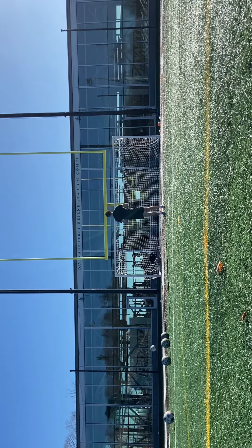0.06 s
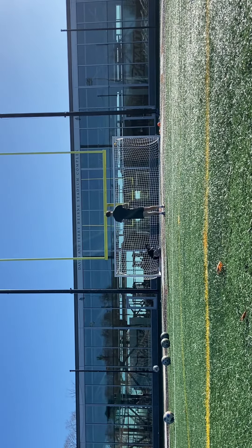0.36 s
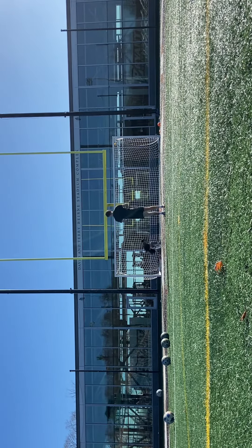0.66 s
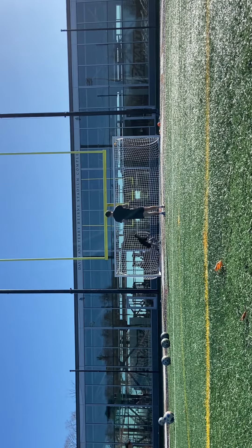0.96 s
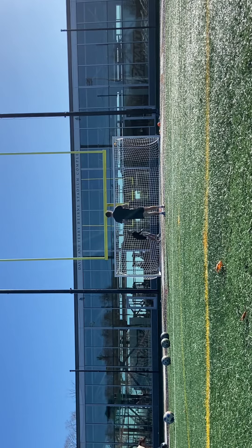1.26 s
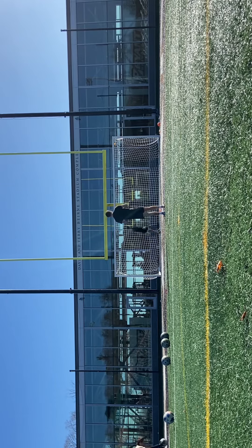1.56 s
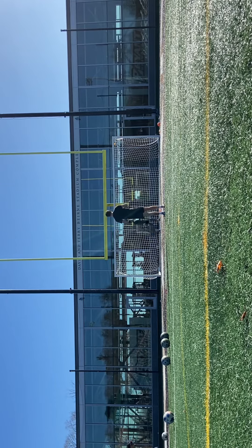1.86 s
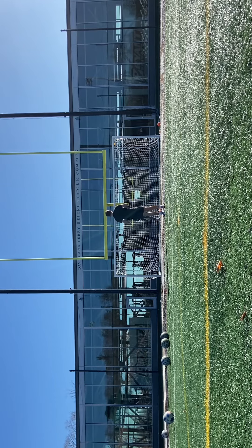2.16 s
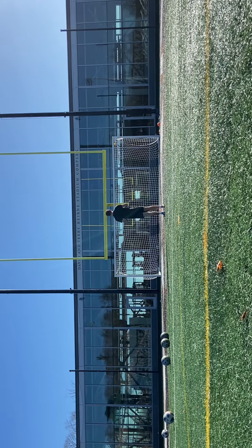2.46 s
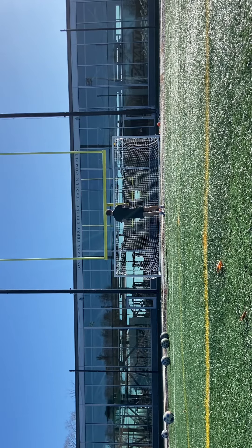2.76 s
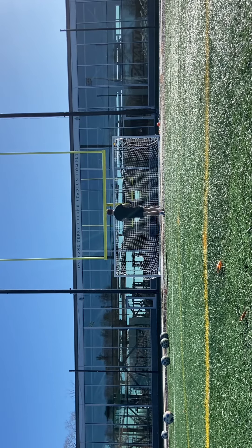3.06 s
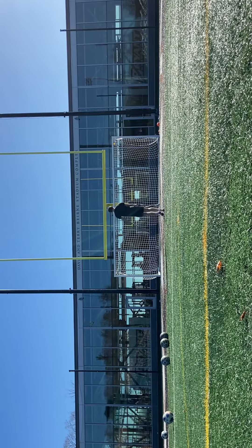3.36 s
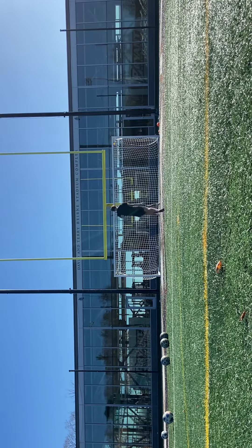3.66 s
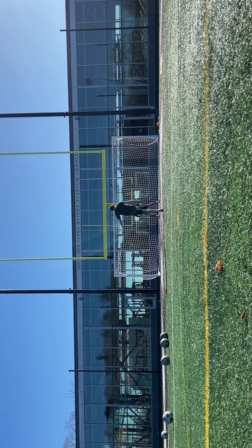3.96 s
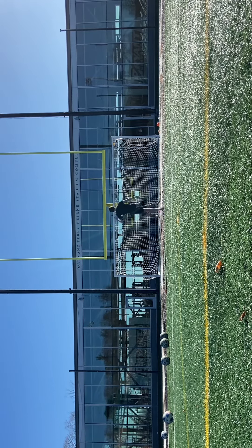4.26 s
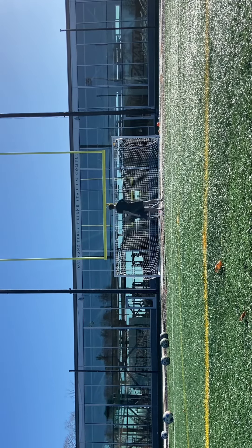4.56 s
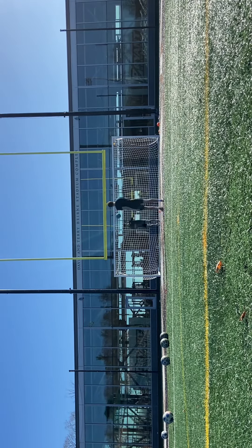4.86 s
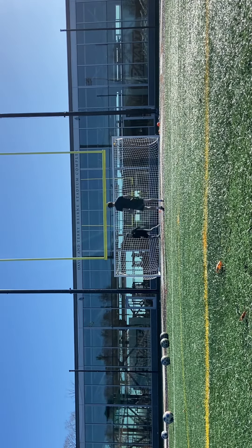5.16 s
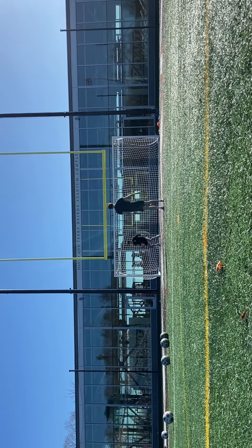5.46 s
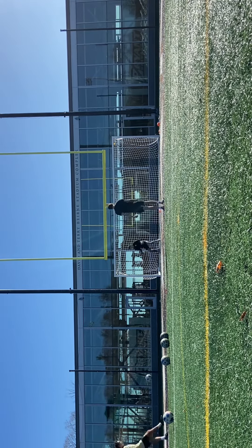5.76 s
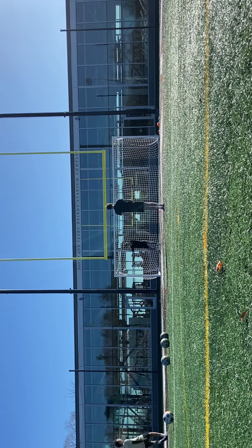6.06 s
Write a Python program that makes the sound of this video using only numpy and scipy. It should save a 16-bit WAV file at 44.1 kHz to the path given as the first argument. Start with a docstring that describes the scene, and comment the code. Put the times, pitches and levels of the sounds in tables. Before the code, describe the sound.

An outdoor artificial pitch is heard from a microphone at turf height, with a faint, steady town hum and a low rumble that fades after about 2 seconds. At 0.1 seconds a ball gives one soft, heavy thump; a few far fainter thumps follow until about 4.2 seconds. Wind strikes the microphone in short, fluttering puffs, weak at first, stronger around 2 and 2.7 seconds. The strongest gust, from 3.2 to 3.7 seconds, churns and booms hollowly, with dry spitting snaps. Thinner, crackling puffs with little bass continue until about 5 seconds. A sharp, hard knock with a brief rattle stands out at 4.3 seconds; lighter ticks, faint rustles and scuffs come and go. The wind lulls, then puffs return from 5.7 seconds to the end just after 6. Small birds chirp and whistle very faintly in the distance throughout.

```python
"""A low rumble and a distant town's hum, then a ball's thump, on an artificial pitch in gusty wind.
The microphone is in a camera standing on the turf. Eddies hit its port as short, fluttering puffs
that spit at their crests; the bass thins out while the gusts last, and the strongest gust churns
and booms hollowly. Small birds chirp and whistle far off; light knocks, rustles and scuffs come and go."""
import sys
import numpy as np
from scipy import signal
from scipy.fft import rfft, irfft, next_fast_len
from scipy.io import wavfile
from scipy.ndimage import uniform_filter1d, map_coordinates

SR = 44100
rng = np.random.default_rng(int(sys.argv[2]) if len(sys.argv) > 2 else 0)


def unload_audio(sound):
    """Save the sound as a 16-bit wav file, at the path given as the first command line argument."""
    columns = np.transpose(np.atleast_2d(sound))
    # keep every value between -1 and 1, then stretch to whole-number steps
    steps = np.round(np.clip(columns, -1, 1) * 32767)
    wavfile.write(sys.argv[1], SR, steps.astype(np.int16))


N = 272979


def amp(db):
    """Decibels to gain."""
    return 10 ** (np.asarray(db) / 20)


def unit(x):
    """Scale to rms 1."""
    return x / np.sqrt(np.mean(x ** 2) + 1e-30)


def along(points, hz):
    """(Hz, value) points read on a log axis."""
    freqs, values = np.transpose(points)
    return np.interp(np.log(hz + 1), np.log(freqs + 1), values)


def wobble(rate, size=N):
    """A smooth random curve, rate knots a second."""
    return map_coordinates(rng.standard_normal(4096), [np.arange(size) * rate / SR], mode="mirror")


def filtered(x, response):
    """x times a complex response of frequency."""
    n = x.shape[-1]
    padded = next_fast_len(n + n // 10)
    return irfft(rfft(x, padded) * response(np.fft.rfftfreq(padded, 1 / SR)), padded)[..., :n]


def noise(size, colour):
    """Noise of rms 1, coloured by a gain for each frequency."""
    return unit(filtered(rng.standard_normal(size), colour))


def above(hz, edge_hz, steep):
    """Gain of a low cut."""
    return 1 / np.sqrt(1 + (edge_hz / (hz + 1)) ** (2 * steep))


def add(track, s, sound):
    """Mix a sound into a track from time s."""
    start = round(s * SR)
    a, b = max(start, 0), min(start + len(sound), N)
    track[a:b] += sound[a - start:b - start]


def from_left(x, lag_s):
    """A sound that reaches the left port sooner by lag_s (later, if negative)."""
    return filtered(x, lambda hz: np.exp(-2j * np.pi * hz * np.array([[0], [lag_s]])))


# The town's hum and rumble, far beyond the pitch: (frequency [Hz], relative level [dB])
HUM_SPECTRUM = [(150, -3.5), (300, -12.5), (500, -5), (900, -3.5), (1300, -3.5), (2000, -10), (2600, -12.5),
                (3400, -19), (5200, -22.5), (6500, -29.5), (8500, -43), (11500, -43.5), (15000, -50)]
RUMBLE_SPECTRUM = [(120, 10.5), (220, 3), (330, 0.5), (500, -6.5), (800, -20.5), (1500, -65.5)]
# The rumble's rise and fall: (time [s], level [dB])
RUMBLE_LEVELS = [(0, -47), (.5, -51), (1.4, -44), (2.4, -62.5), (6.19, -63)]
def town(hum_db=-58, waver_db=2.0, flutter_db=3.0):
    """A wide, steady hum from far away to the right, over a low, uneven rumble."""
    def stereo(spectrum, alike):
        mid, side = filtered(rng.standard_normal((2, N)), lambda hz: amp(along(spectrum, hz)))
        side = side * np.sqrt((1 - alike) / (1 + alike))
        return unit(np.array([mid + side, mid - side]))
    hum = stereo(HUM_SPECTRUM, alike=0.39) * amp(hum_db + waver_db * wobble(2.4))
    rumble_db = np.interp(np.arange(N) / SR, *np.transpose(RUMBLE_LEVELS))
    rumble = stereo(RUMBLE_SPECTRUM, alike=1.0) * amp(rumble_db + flutter_db * wobble(13))
    return from_left(hum + rumble, lag_s=-0.00039)


# Where the bass ends at the microphone, higher in the gusts: (time [s], edge [Hz])
LOW_CUT = [(0, 224), (1.85, 229), (1.94, 287), (1.985, 432), (2.03, 526), (2.1, 540), (2.52, 525),
           (2.565, 292), (2.61, 440), (2.67, 380), (2.71, 230), (3.05, 350), (3.25, 201), (3.6, 234),
           (3.68, 503), (3.9, 560), (4.5, 683), (5.45, 525), (5.62, 340), (6.19, 320)]
def thin_bass(x):
    """Take away what lies under the moving bass edge."""
    hz, times, spectra = signal.stft(x, SR, nperseg=1024, noverlap=768)
    spectra = spectra * above(hz[:, None], np.interp(times, *np.transpose(LOW_CUT)), steep=10.7)
    return signal.istft(spectra, SR, nperseg=1024, noverlap=768)[1][..., :N]


# The ball, near and far on the pitch: (time [s], level [dB], toneless share [0-1])
BALL_THUMPS = [(0.116, -22, 0.16), (0.815, -67, 1), (1.132, -53, 0.9), (1.66, -60, 1), (1.848, -60, 0.9),
               (3.277, -47, 0.75), (4.234, -58, 0.05)]
def ball_thumps(rest_hz=54, drop_hz=290, settle_s=0.0086, rise_s=0.022, slap_s=0.014, lowest_hz=40):
    """A soft, heavy blow: a slap, then a few uneven, sinking cycles; far ones are mostly toneless."""
    out, t = np.zeros(N), np.arange(SR // 6) / SR
    swell = (t / rise_s * np.exp(1 - t / rise_s)) ** 3
    swell /= 1 + (t / (2.3 * rise_s)) ** 14  # stops short
    contact = (t / slap_s * np.exp(1 - t / slap_s)) ** 2
    def low_noise(top_hz):
        return noise(len(t), lambda hz: above(hz, lowest_hz, steep=2) / (1 + (hz / top_hz) ** 4))
    for s, db, toneless in BALL_THUMPS:
        uneven = np.exp(0.2 * wobble(150, len(t)))
        pitch_hz = (rest_hz + drop_hz * np.exp(-t / settle_s)) * uneven
        tone = np.sin(2 * np.pi * np.cumsum(pitch_hz) / SR)
        body = (1 - toneless) * tone + toneless * low_noise(top_hz=115)
        slap = amp(-16) * contact * low_noise(top_hz=420)
        add(out, s, amp(db) * (swell * body + slap))
    return signal.sosfilt(signal.butter(3, lowest_hz, "highpass", fs=SR, output="sos"), out)


# Wind at the microphone: (time [s], small-eddy level [dB], reach [Hz])
GUSTS = [(0, -81, 230), (1.2, -47.5, 181), (1.8, -38, 226), (2.25, -40.5, 306), (2.401, -56, 320),
         (3.1, -40.5, 324), (3.351, -42.5, 308), (3.801, -44, 778), (4.55, -43, 783), (4.999, -46.5, 654),
         (5.3, -52, 397), (5.65, -41, 286), (6.19, -44, 253)]
def wind_at(s):
    """Level and reach at time s; the reach sets how far up in pitch the turbulence extends."""
    times, db, reach_hz = np.transpose(GUSTS)
    return np.interp(s, times, db), np.interp(s, times, reach_hz)


def small_eddies(per_s=24, typical_s=0.0095, scatter_db=4):
    """A loose train of weak puffs that follows the wind: (time [s], level [dB], duration [s])."""
    count = int(per_s * N / SR)
    times = (np.arange(count) + rng.random(count)) / per_s
    louder, longer = rng.standard_normal((count, 2)).T
    levels = wind_at(times)[0] + scatter_db * np.minimum(louder, 1)
    return list(zip(times, levels, typical_s * np.exp(0.79 * longer)))


# How the microphone port colours the air's noise: (frequency [Hz], gain [dB])
PORT_RESPONSE = [(150, 6.5), (250, -10), (330, -7.5), (400, -5.5), (470, 1), (600, 3.5), (900, 8),
                 (1300, 7.5), (2000, 1), (3000, -1), (6000, 7.5)]
def turbulence(size, reach_hz, edge_hz):
    """Swirling air at the port: ever smaller whirls are exponentially weaker."""
    def colour(hz):
        return amp(along(PORT_RESPONSE, hz)) * np.exp(-hz / reach_hz) * above(hz, edge_hz, steep=2.69)
    return noise(size, colour)


USUAL_EDDY_DB, BRIGHTEST_EDDY_DB = -27.5, -15.5  # past the second, an eddy gets no brighter
def eddy(s, db, duration, flutter_db=4.0, db_per_octave=13, lowest_hz=290):
    """One puff, centred in a quarter second: it swells, crackles and fades, brightest on its crests."""
    t = np.arange(-SR // 8, SR // 8) / SR
    capped_db = min(db, BRIGHTEST_EDDY_DB)
    reach_hz = wind_at(s)[1] * 2 ** ((capped_db - USUAL_EDDY_DB) / db_per_octave)
    edge_hz = max(np.interp(s, *np.transpose(LOW_CUT)), lowest_hz)
    width = duration * np.where(t < 0, 0.91, 1.09)  # rises faster than it falls
    swell = np.exp2(-abs(2 * t / width) ** 1.89 / 2)
    force = swell * amp(flutter_db * np.tanh(wobble(218.55, len(t))))  # small whirls ride the large one
    swirl = turbulence(len(t), 0.79 * reach_hz, edge_hz)
    swirl /= np.sqrt(uniform_filter1d(abs(swirl), size=300))  # evened out, so the force shapes the puff
    crests = unit(force ** 2 * turbulence(len(t), 1.074 * reach_hz, edge_hz))
    puff = unit(force * swirl) + amp(-6) * crests
    puff *= np.linalg.norm(swell) / np.linalg.norm(puff)
    return amp(db) * puff + amp(capped_db) * crackle(force, reach_hz)


# A snap of air right at the port: (frequency [Hz], relative level [dB])
SNAP_SPECTRUM = [(400, -16.5), (900, 16.5), (1500, 6), (2300, -3.5), (3300, -14), (5000, -30.5),
                 (8000, -60)]
def crackle(force, reach_hz, per_s=300, full_reach_hz=750):
    """Tiny dry snaps at chance moments of a puff, fading out in slow air."""
    ticks = force * (rng.random(len(force)) < per_s / SR) * rng.standard_normal(len(force))
    colour = lambda hz: amp(along(SNAP_SPECTRUM, hz))
    snaps = filtered(ticks, lambda hz: colour(hz) / colour(hz).mean())
    return amp(-11) * min(reach_hz / full_reach_hz, 1) ** 2 * snaps


# Strong eddies striking the microphone: (time [s], level [dB], duration [s])
STRONG_EDDIES = [(0.182, -39, 0.0051), (0.488, -37.5, 0.0054), (0.542, -38, 0.01), (0.829, -40, 0.024),
                 (1.133, -34, 0.014), (1.378, -39, 0.056), (1.452, -39, 0.0058), (1.572, -33.5, 0.024),
                 (1.723, -40.5, 0.039), (1.749, -33.5, 0.033), (1.78, -30.5, 0.015), (1.799, -28.5, 0.013),
                 (1.823, -30, 0.012), (1.931, -30.5, 0.027), (1.96, -29, 0.024), (1.984, -21.5, 0.0076),
                 (1.995, -25.5, 0.0087), (2.008, -32, 0.023), (2.062, -38, 0.0075), (2.1, -44.5, 0.02),
                 (2.173, -37, 0.011), (2.223, -36.5, 0.028), (2.266, -36.5, 0.031), (2.323, -40, 0.027),
                 (2.477, -38, 0.0057), (2.515, -38.5, 0.014), (2.557, -33, 0.014), (2.566, -34, 0.015),
                 (2.63, -31, 0.0036), (2.666, -28.5, 0.0118), (2.686, -24, 0.022), (2.896, -31.5, 0.0058),
                 (2.963, -42, 0.0072), (3.004, -33.5, 0.0065), (3.03, -38, 0.025), (3.077, -36, 0.0065),
                 (3.134, -30.5, 0.0061), (3.178, -34.5, 0.015), (3.2574, -24, 0.011), (3.281, -13.5, 0.016),
                 (3.299, -22.5, 0.0056), (3.356, -21, 0.015), (3.392, -23, 0.014), (3.41, -32, 0.0049),
                 (3.441, -20, 0.015), (3.5706, -34, 0.008), (3.6094, -29, 0.0052), (3.61, -23.5, 0.0094),
                 (3.626, -26, 0.014), (3.666, -28, 0.017), (3.699, -29, 0.018), (3.741, -35.5, 0.012),
                 (3.841, -29.5, 0.015), (3.869, -29.5, 0.02), (3.917, -40, 0.022), (3.997, -29, 0.017),
                 (4.015, -30.5, 0.016), (4.027, -38, 0.0067), (4.045, -29.5, 0.012), (4.11, -26.5, 0.0076),
                 (4.137, -33.5, 0.022), (4.153, -29.5, 0.0035), (4.175, -35.5, 0.0089),
                 (4.202, -29, 0.0066), (4.212, -29, 0.014), (4.2463, -29, 0.0093), (4.261, -25.5, 0.0077),
                 (4.299, -35, 0.019), (4.35, -29, 0.03), (4.366, -33.5, 0.0059), (4.413, -36, 0.005),
                 (4.426, -29, 0.0063), (4.445, -28.5, 0.016), (4.487, -28.5, 0.018), (4.52, -29.5, 0.012),
                 (4.594, -29.5, 0.01), (4.615, -27.5, 0.023), (4.636, -34.5, 0.0097),
                 (4.658, -26.5, 0.0013), (4.675, -38.5, 0.0037), (4.748, -43.5, 0.029), (4.817, -38, 0.03),
                 (4.887, -42, 0.022), (4.925, -29, 0.01), (4.947, -34, 0.024), (5.005, -37.5, 0.0056),
                 (5.017, -42, 0.021), (5.093, -45, 0.015), (5.515, -41.5, 0.0059), (5.546, -42, 0.0084),
                 (5.687, -33, 0.018), (5.722, -34.5, 0.026), (5.88, -36, 0.016), (5.935, -35, 0.013),
                 (5.977, -32, 0.012), (6.04, -28, 0.021), (6.148, -34.5, 0.016)]
# The wind's lead in the right channel: (frequency [Hz], phase [rad])
WIND_RIGHT_LEAD = [(100, 0), (280, 1.21), (550, 1.19), (1200, 1.6), (1550, 3), (2300, 8)]
# The wind's lean to the left: (frequency [Hz], left minus right [dB])
WIND_LEFT_BIAS = [(200, 0), (850, 1.5), (1200, 3.5), (1750, 16.5), (3000, 17)]
def wind(stray_db=-13):
    """Eddies, booms and spits pass one after another; both channels mostly share one port."""
    air = booms() + spits()
    for s, db, duration in STRONG_EDDIES + small_eddies():
        puff = eddy(s, db, duration)
        add(air, s - len(puff) / SR / 2, puff)
    # a second port feels the same puffs, weaker and with a swirl of its own
    strength = np.sqrt(abs(uniform_filter1d(air ** 2, size=400)))
    stray = amp(stray_db) * strength * turbulence(N, reach_hz=231, edge_hz=110)
    def channels(hz):
        right = amp(-along(WIND_LEFT_BIAS, hz)) * np.exp(1j * along(WIND_RIGHT_LEAD, hz))
        return np.array([np.ones_like(right), right]) * np.sqrt(2 / (1 + abs(right) ** 2))
    return filtered(air, channels) + np.array([stray, -stray])


# Faint rustles in front of the microphone: (time [s], relative level [dB], duration [s])
LONE_RUSTLES = [(1.824, -63, 0.016), (2.015, -59, 0.05), (2.153, -64, 0.02), (2.956, -58.5, 0.052),
                (3.075, -65, 0.035), (3.151, -63.5, 0.016), (3.3, -60, 0.03), (3.455, -61.5, 0.023),
                (3.611, -62, 0.026), (3.715, -62, 0.026), (3.855, -61, 0.035), (3.975, -60.5, 0.059),
                (4.062, -61, 0.013), (4.324, -58.5, 0.12), (4.518, -61.5, 0.027), (4.582, -64.5, 0.018),
                (4.8, -59, 0.011), (4.956, -59, 0.033), (5.725, -58, 0.021), (6.013, -61, 0.02)]
# Their high, thin colour: (frequency [Hz], relative level [dB])
RUSTLE_SPECTRUM = [(1500, 3), (3500, 12.5), (5500, 2), (7800, 8.5), (9000, -21.5), (10200, 3.5), (12000, 3),
                   (13200, -17.5), (14700, 2), (15500, -13)]
def rustles(grain_db=5, fast_reach_hz=700, hiss_delay_s=0.008, hiss_s=0.018):
    """Brief, grainy hisses: some on their own, and one behind each strong eddy, louder in fast wind."""
    t = np.arange(N) / SR
    hisses = []
    for s, db, _ in STRONG_EDDIES:
        speed_db = 5.5 * np.log2(wind_at(s)[1] / fast_reach_hz)
        hisses.append((s + hiss_delay_s, -76.5 + 0.15 * (db - USUAL_EDDY_DB) + speed_db, hiss_s))
    swell = sum(amp(db) * np.exp2(-2 * np.minimum(abs(t - s) / duration, 10) ** 2)
                for s, db, duration in LONE_RUSTLES + hisses)
    grains = rng.standard_normal(N) * amp(grain_db * wobble(600))
    return amp(-9) * swell * unit(filtered(grains, lambda hz: amp(along(RUSTLE_SPECTRUM, hz))))


# Small birds, far off: (time [s], duration [s], start pitch [Hz], end pitch [Hz], level [dB])
BIRD_CHIRPS = [(0.43, 0.06, 2800, 3000, -76), (0.49, 0.06, 3380, 3250, -76), (1.06, 0.07, 2600, 2830, -68),
               (6.02, 0.13, 2050, 2230, -72)]
def bird_chirps(quaver=0.015):
    """Each note is one soft, thin glide."""
    out = np.zeros(N)
    for s, duration, from_hz, to_hz, db in BIRD_CHIRPS:
        progress = np.linspace(0, 1, int(duration * SR))
        hz = (from_hz + (to_hz - from_hz) * progress) * (1 + quaver * wobble(400, len(progress)))
        add(out, s, amp(db) * np.sin(np.pi * progress) * np.sin(2 * np.pi * np.cumsum(hz) / SR))
    return out


# A distant bird's thin whistles: (time [s], duration [s], level [dB])
BIRD_WHISTLES = [(0.632, 0.28, -78), (1.85, 0.18, -77.5), (2.913, 0.25, -72), (4.068, 0.15, -70),
                 (5.232, 0.18, -66.5)]
def bird_whistles(from_hz=6720, toward_hz=6220, upper_ratio=1.85, quaver=0.017, echo_t60_s=0.15):
    """Each whistle drops, levels off and fades, with a faint higher line; fence and walls blur it."""
    out = np.zeros(N)
    for s, duration, db in BIRD_WHISTLES:
        progress = np.linspace(0, 1, int(duration * SR))
        hz = toward_hz + (from_hz - toward_hz) * np.exp(-2.5 * progress)
        hz *= 1 + quaver * wobble(970, len(progress))
        phase = 2 * np.pi * np.cumsum(hz) / SR
        swell = np.minimum(progress / 0.027, 1) * (1 - progress) ** 0.27
        upper = amp(-11) * (1 - progress) * np.sin(upper_ratio * phase)
        add(out, s, amp(db) * swell * (np.sin(phase) + upper))
    t = np.arange(SR // 3) / SR
    echo = rng.standard_normal((2, len(t))) * amp(-60 * t / echo_t60_s)
    return signal.fftconvolve(out[None], echo / np.linalg.norm(echo[0]), axes=1)[:, :N]


# Light knocks, near the middle: (time [s], level before the band cut [dB], most excited pitch [Hz])
LIGHT_KNOCKS = [(0.977, -49, 1800), (1.231, -46, 3900), (1.2535, -40, 1700), (1.983, -47, 5000),
                (3.9214, -30, 6000), (4.2695, -16, 1500), (4.2817, -25, 2300), (4.2872, -34, 2300),
                (4.2945, -35, 1700), (4.3215, -45, 3500), (4.338, -46, 3900), (4.3605, -42, 3900),
                (5.716, -48, 3900)]
# The case that rings with them: (frequency [Hz], relative level [dB], time to fall 60 dB [s])
CASE_MODES = [(1440, 3, 0.0062), (2226, 4.5, 0.0098), (3170, -3.5, 0.008), (3840, 0, 0.0058),
              (5250, -8.5, 0.01), (7200, -22.5, 0.0087), (11400, -24, .007)]
def knocks(crack_t60_s=0.0088, tail_db=-25, tail_t60_s=0.085, focus_db_per_octave=7):
    """Hard little contacts without bass: a crack, a short ring and a faint scatter."""
    out, t = np.zeros(N), np.arange(SR // 10) / SR
    for s, db, centre_hz in LIGHT_KNOCKS:
        strike = rng.normal([0, 1], [2, 0.06], (len(CASE_MODES), 2))  # each mode's level and tuning vary
        ring = sum(amp(level + extra_db - 60 * t / t60) * np.sin(2 * np.pi * hz * detune * t)
                   for (hz, level, t60), (extra_db, detune) in zip(CASE_MODES, strike))
        grit = noise(len(t), lambda hz: above(hz, 800, steep=5.8) / (1 + (hz / 3500) ** 2))
        crack = grit * amp(-60 * t / crack_t60_s)
        scatter = grit * amp(tail_db - 60 * t / tail_t60_s)
        hit = (ring + crack + scatter) * (1 - np.exp(-t / 0.0007))
        hit = filtered(hit, lambda hz: amp(-focus_db_per_octave * abs(np.log2((hz + 1) / centre_hz))))
        add(out, s, amp(db) * hit / abs(hit).max())
    return filtered(out, lambda hz: above(hz, 690, steep=9.4) / (1 + (hz / 12500) ** 8))


# Scuffs from across the pitch: (time [s], level [dB], duration [s], centre [Hz])
TURF_SCUFFS = [(2.07, -67.5, 0.018, 4400), (2.947, -70, 0.052, 5000), (3.07, -74, 0.034, 4970),
               (3.24, -70.5, 0.013, 5300)]
def scuffs(half_width_hz=560, grain_db=3):
    """Scuffed turf gives a brief, narrow, grainy hiss."""
    out, t = np.zeros(N), np.arange(-SR // 8, SR // 8) / SR
    for s, db, duration, centre_hz in TURF_SCUFFS:
        hiss = noise(len(t), lambda hz: 1 / (1 + ((hz - centre_hz) / half_width_hz) ** 4))
        swell = np.exp2(-2 * (t / duration) ** 2)
        add(out, s + t[0], amp(db + grain_db * wobble(200, len(t))) * swell * hiss)
    return out


# The sharpest whirls, right at the port: (time [s], level [dB])
PORT_SPITS = [(2.688, -26), (3.2715, -31), (3.2757, -10.5), (3.2842, -27), (3.289, -22.5), (3.361, -26.5),
              (3.439, -32), (3.4437, -18), (3.593, -31), (3.6039, -29), (3.654, -23.5), (3.6683, -31),
              (3.695, -21), (4.026, -21.5), (4.0305, -15), (4.106, -34.5), (4.168, -28), (4.365, -14.5),
              (4.4911, -23), (4.4978, -18), (4.506, -22), (4.617, -27), (4.627, -26), (4.644, -24)]
def spits(life_s=0.00062):
    """A whirl collapses within a millisecond or two: a dry snap, brighter than its puff."""
    out, t = np.zeros(N), np.arange(-SR // 50, SR // 50) / SR
    for s, db in PORT_SPITS:
        burst = rng.standard_normal(len(t)) * np.exp(-abs(t) / life_s)
        snap = filtered(burst, lambda hz: amp(along(SNAP_SPECTRUM, hz)))
        add(out, s + t[0], amp(db) * snap / abs(snap).max())
    return out


# The hollow that the strongest gust stirs: (centre [Hz], width [Hz], relative level [dB])
HOLLOW_RESONANCES = [(210.7, 87, 2.5), (280, 60, -13.5), (476, 110, 7.5)]
# Its churning at the microphone: (time [s], level [dB])
CHURN_LEVELS = [(3.1, -86), (3.21, -40.5), (3.29, -30), (3.37, -39), (3.448, -40.5), (3.51, -52.5),
                (3.6, -44), (3.701, -61), (3.85, -80)]
def churn(flutter_db=1.5):
    """Between its puffs the strongest gust keeps a few low, hollow resonances stirring."""
    def colour(hz):
        return sum(amp(db) / (1 + (2 * (hz - centre) / width) ** 8)
                   for centre, width, db in HOLLOW_RESONANCES)
    level_db = np.interp(np.arange(N) / SR, *np.transpose(CHURN_LEVELS), left=-np.inf, right=-np.inf)
    return amp(level_db + flutter_db * wobble(40)) * noise(N, colour)


# Booms at the port: (time [s], level [dB], duration [s], pitch [Hz], upper partial [dB])
GUST_BOOMS = [(3.2815, -11, 0.0081, 322.5, -17), (3.311, -24.5, 0.012, 298.5, -18),
              (3.361, -23.5, 0.0071, 203.5, -3), (3.549, -27, 0.0063, 460, -25),
              (3.671, -13.5, 0.012, 460, -7)]
def booms(upper_ratio=1.9, waver=0.048):
    """The strongest gust sounds short hollow tones, two unsteady partials each."""
    out, t = np.zeros(N), np.arange(-SR // 8, SR // 8) / SR
    for s, db, duration, hz, upper_db in GUST_BOOMS:
        phase = 2 * np.pi * np.cumsum(hz * np.exp(waver * wobble(140, len(t)))) / SR
        swell = 1 / np.cosh(2 * t / duration)
        add(out, s + t[0], amp(db) * swell * (np.sin(phase) + amp(upper_db) * np.sin(upper_ratio * phase)))
    return out


def scene():
    """The pitch from turf height: wind and hum, churning to the right, small events near the middle."""
    air = thin_bass(wind() + town())
    ball = ball_thumps()
    right = from_left(churn(), lag_s=-0.00052)
    middle = from_left(knocks() + rustles() + scuffs() + bird_chirps(), lag_s=0.00002)
    return air + ball + right + middle + bird_whistles()


BAND_LIMIT_HZ = 15600
def record(dry):
    """The camera keeps nothing above its band limit."""
    return filtered(dry, lambda hz: hz < BAND_LIMIT_HZ)


dry = scene()
out = record(dry)
unload_audio(out)
```